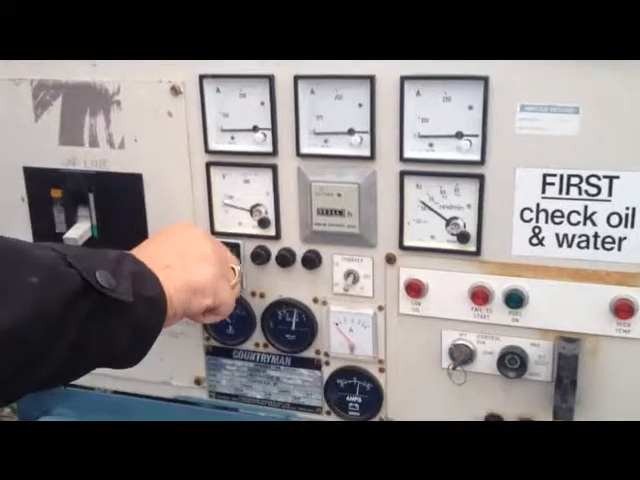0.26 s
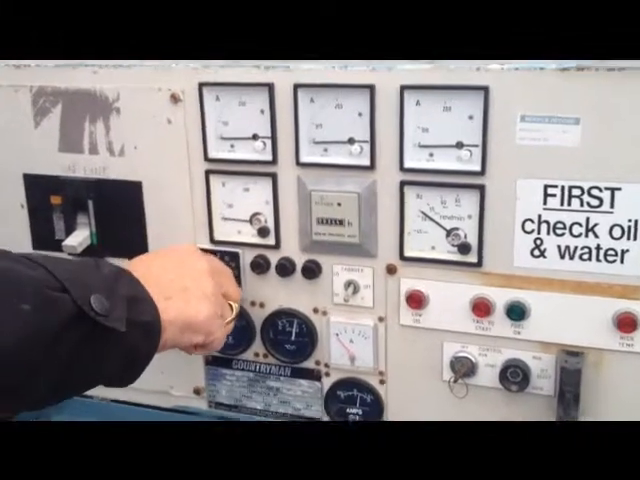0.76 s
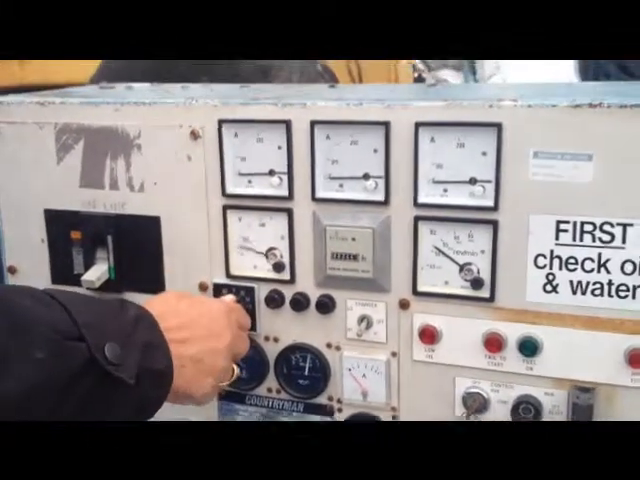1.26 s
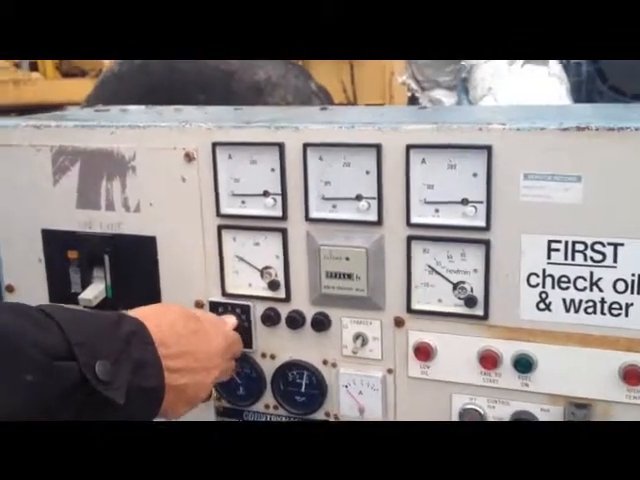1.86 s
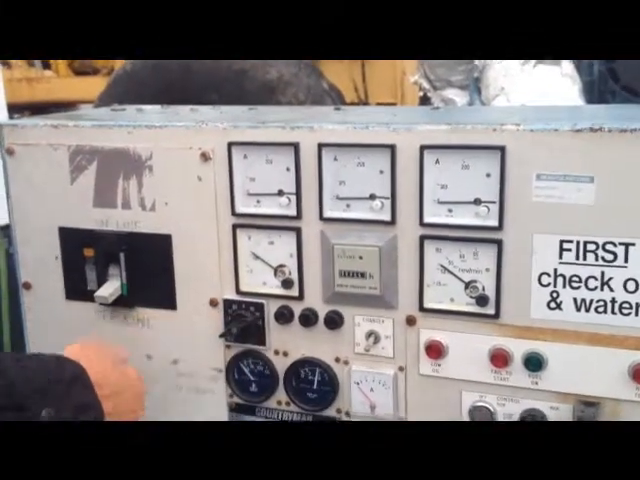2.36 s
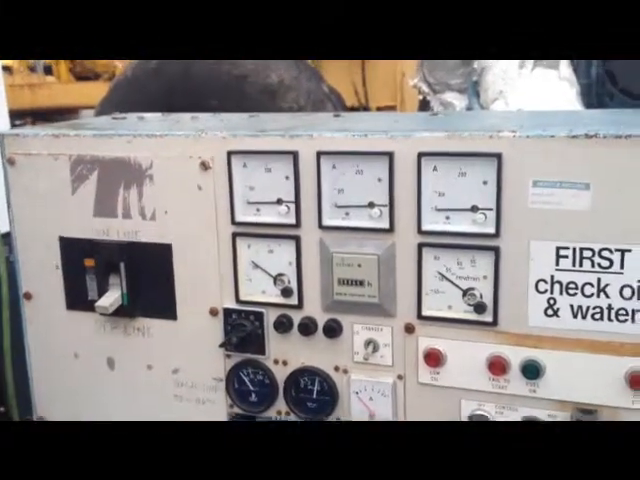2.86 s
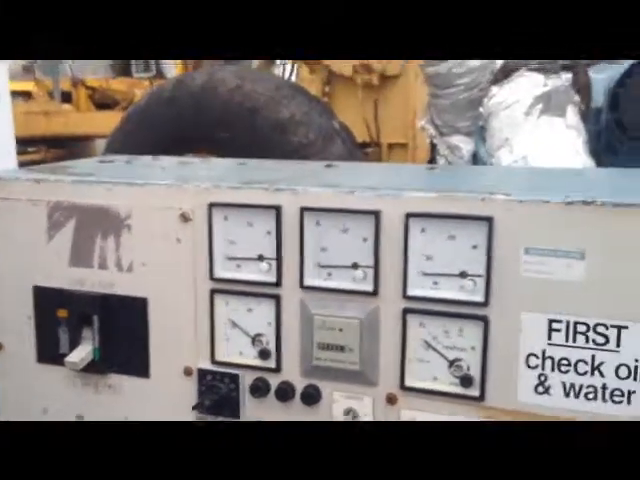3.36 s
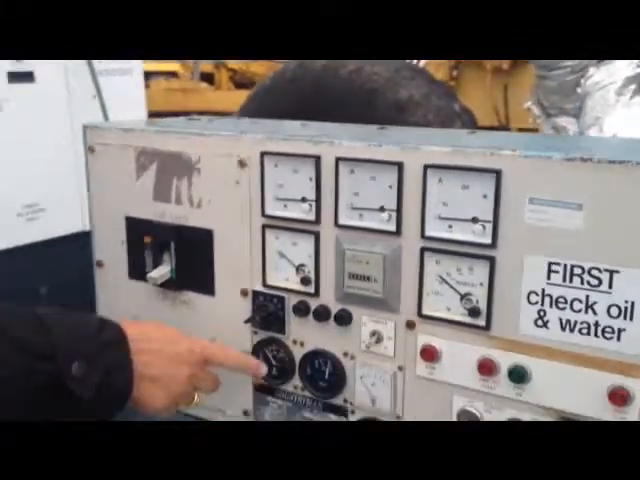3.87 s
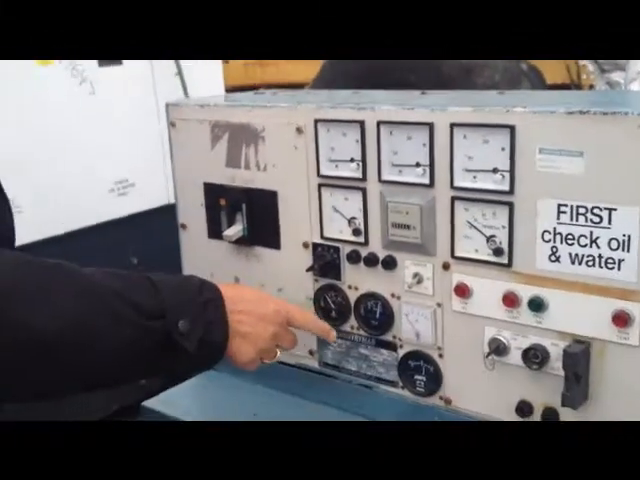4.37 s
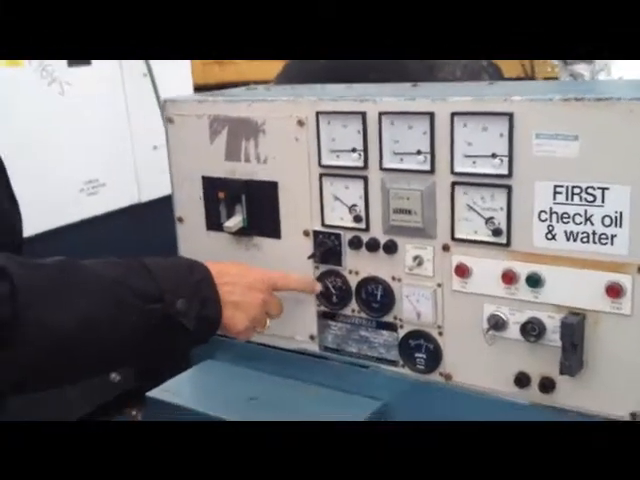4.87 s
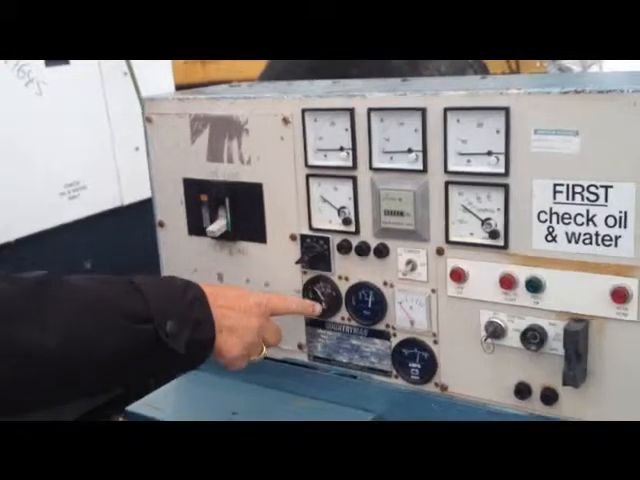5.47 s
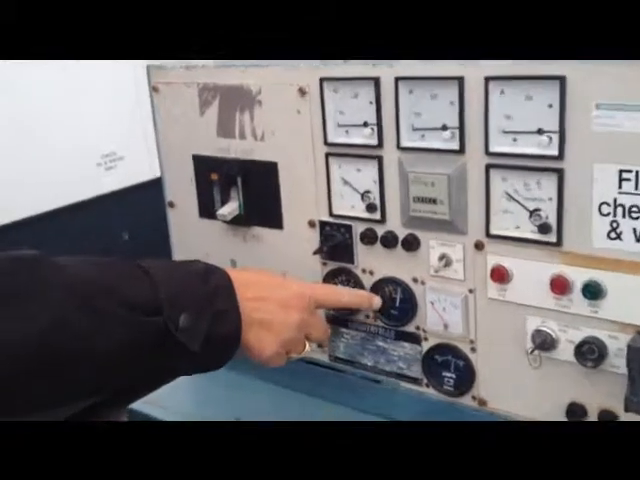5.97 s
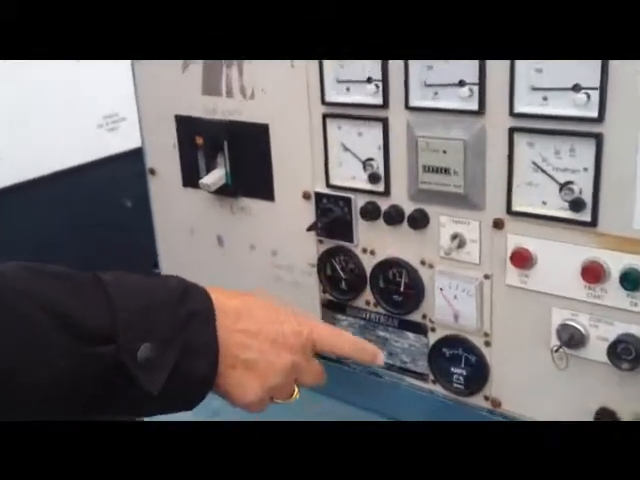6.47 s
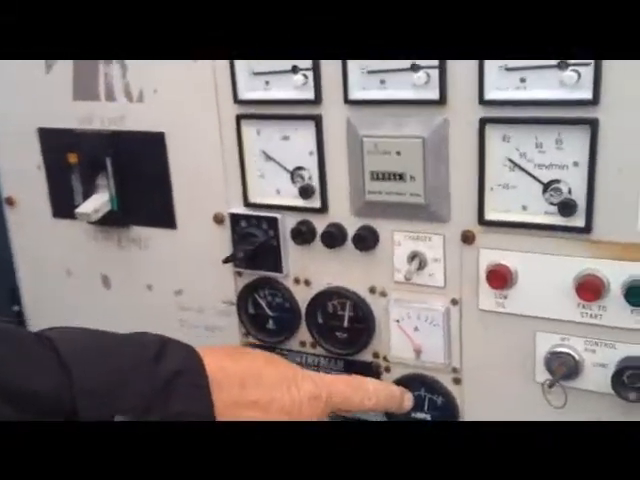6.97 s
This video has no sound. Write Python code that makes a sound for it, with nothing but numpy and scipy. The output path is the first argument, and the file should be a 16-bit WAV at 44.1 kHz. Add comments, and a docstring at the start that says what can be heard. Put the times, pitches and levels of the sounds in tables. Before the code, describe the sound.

Heard from close by outdoors, a big diesel generator hums and chugs at a constant speed. Rapid knocking and bright metal rattling ride over the droning exhaust and the fan's rushing air, with a few faint sharp ticks. The whole sound pulses quickly and regularly, then evens out in the last seconds as the moving microphone comes closer to the dials.

```python
"""A throbbing exhaust drone with metal clatter on top: a six-cylinder diesel generator in a yard, close by.
The exhaust beats against the fan's blade tone, each firing knocks the block, and injectors and valves
clatter over the rush of the fan. The governor hunts, so everything throbs about four times a second,
less towards the end. One microphone, through a limiter, rises to the top edge of the control panel,
turns along it and moves in on the dials."""
import sys
import numpy as np
from scipy import signal
from scipy.fft import rfft, irfft, next_fast_len
from scipy.io import wavfile
from scipy.ndimage import uniform_filter1d

SR = 44100
rng = np.random.default_rng(int(sys.argv[2]) if len(sys.argv) > 2 else 0)


def store_pcm(level_fs):
    """Save levels as 16-bit WAV."""
    pcm = np.round(np.clip(level_fs, -1, 1) * 32767).astype(np.int16)
    wavfile.write(sys.argv[1], SR, np.atleast_2d(pcm).T)


N = 318402
TIME_S = np.arange(N) / SR

CYCLE_HZ, HUNT_HZ = 13.114, 4.08  # four-stroke cycles (two turns each); the governor's swing
HARD_PLACE = 0.42  # where in the cycle (0-1) the hardest exhaust pulse leaves
SILENCER_HARMONIC = 18  # the silencer rings on this multiple of the cycle rate
# The microphone's moves, each as start_s, end_s
LIFT_S, CLOSE_S = (1.7, 4.1), (5.1, 6.9)  # up to the panel's top edge; in towards the dials
TURN_S, TURN_BACK_S = (2.97, 4.65), (6.99, 7)  # along the panel; back to face it

# Levels in the tables are relative; a harmonic is a multiple of the cycle rate.
# Bands that swell or fade as the microphone moves: centre_hz, width_hz, lifted_db, turned_db, close_db
MIC_BANDS = [(400, 86, 1.5, -2, -1.5), (518, 27, -3, 4.5, 0), (685, 19, 2, 3.5, -5), (790, 40, -2, 0, 0.5),
             (1100, 130, -1, 1, 0.5), (1610, 50, -6, -2, 1), (2450, 200, 1, -1, 0),
             (2950, 270, 2.5, -0.5, 2), (3700, 380, 0, 0.3, 0), (4700, 300, -3, -1.5, 1),
             (5450, 290, 1.2, -3.5, 0.5), (6670, 480, 0, 2.5, -1), (9000, 1200, 2.5, 0.5, 1)]
# Spectrum of the block's knock and the fan air: frequency_hz, level_db
BLOCK_SPECTRUM = [(190, -36.5), (310, -5), (355, -1.5), (436, -7.5), (514, -3), (555, -6), (615, 0),
                  (706, -3), (769, 0), (853, -4), (1030, -3.2), (1150, -6.5), (1260, -6), (1730, -9.5),
                  (1950, -10.5), (2100, -9.5), (2500, -18.5), (3250, -49), (5500, -120)]
# Spectrum of the injectors and valves: frequency_hz, level_db
CLATTER_SPECTRUM = [(1470, -17.5), (2500, -3), (4310, -3), (5110, -7.5), (6520, -8.5), (8000, -13),
                    (10400, -56.5), (17600, -120)]
# Spectrum of the fizz above the clatter: frequency_hz, level_db
FIZZ_SPECTRUM = [(6000, -35), (8000, -1.5), (8700, -0.5), (9400, -6.5), (10300, -8), (10900, -3),
                 (11600, -6), (13000, -7.5), (14500, -16)]
# Spectrum of the turbulent exhaust gas: frequency_hz, level_db
GAS_SPECTRUM = [(20, -38), (60, -29), (105, -1), (135, 2), (180, -12), (215, 16.5), (270, 3), (305, 7.5),
                (360, -17), (600, -27.5)]
# Cylinders in firing order: place_cycles, knock_db, clatter_db, swing_db (per unit of fuel)
FIRING_ORDER = [(.125, -8, 4, 6.5), (.305, -5.5, 5, -0.5), (0.469, -5, -0.5, -2.5), (.635, -12.5, 5, -2.5),
                (.79, -8.5, 4, 5.5), (.965, -6, 4, 4.5)]
# Surges that rattle harder than the rest: centre_s, block_db, clatter_db
RATTLE_SURGES = [(.01, 4, 3.5), (.31, 2.5, -1), (.55, 2, -0.5), (.76, 2, 2), (.99, 2, 1), (1.22, 2, 1),
                 (1.7, 1.5, 0.5), (1.98, 2, -0.5), (2.22, 2.5, 0.5), (2.68, 2, 1.3), (2.9, 0.5, 1),
                 (3.19, 2.5, 1.8), (3.44, 1.5, 1.5), (4.13, 2.5, 1.5), (4.39, -1.5, 1.5), (4.63, -0.5, 1),
                 (5.42, 2, 1)]
# Sharp metallic ticks at the hardest firings: time_s, level_db
METAL_TICKS = [(.469, -22), (1.219, -21), (1.704, -20), (2.389, -18), (2.689, -19.5), (2.897, -19),
               (4.344, -19)]
# Tones of the block and its casing: harmonic (rounded when played), level_db, turned_db
CASING_TONES = [(39, -46.5, 3), (42, -49.5, 7.5), (45, -46.5, -10), (48, -38, -5), (51, -50.5, 9.5),
                (54, -56, 5), (57, -40, -5), (58, -49.5, 4.5), (60, -43.5, 1.5), (65.6, -46.5, -9),
                (72.3, -42.5, -0.5), (75.3, -46, -5), (77.7, -43, -3.5), (79.2, -51.5, 10),
                (80.96, -40, -0.5), (93, -52.5, 3.5), (96.1, -44, -1), (100.8, -54, 3), (114.7, -46.5, 3.5),
                (124.3, -44, -4)]
# Faint, short low thumps on the loudest beats of the drone: start_s, level_db
LOW_THUMPS = [(0.028, -40), (0.491, -44.5), (0.788, -44.5), (1.02, -41.5), (1.247, -49.5), (1.705, -45),
              (1.934, -46), (2.013, -48), (2.24, -43.5), (2.415, -47), (2.469, -47), (2.697, -41.5),
              (2.925, -38), (3.225, -47.5), (3.458, -35), (3.687, -38.5), (3.917, -39.5), (4.144, -46),
              (4.221, -45.5), (4.372, -43.5), (4.452, -43), (4.682, -46.5), (4.908, -42.5), (5.135, -45),
              (5.213, -43.5), (5.441, -45), (5.674, -47), (5.9, -45.5), (6.13, -45.5)]
# Strong exhaust tones, standing as waves in the yard: harmonic, level_db, lifted_db, turned_db, close_db
STRONG_HARMONICS = [(12, -20.5, 0, -1.01, 3), (15, -25.5, -0.5, -2, 3), (18, -18.5, -1, 0.8, 1.5),
                    (21, -26, -3.5, -2, 0.5), (24, -41, 4, 8, -0.5), (40, -39, -7, 6, -1)]
# Weaker exhaust tones: harmonic, level_db
WEAK_HARMONICS = [(6, -54), (9, -44.5), (10, -39.5), (13, -43.5), (14, -53), (16, -45), (17, -34),
                  (19, -42.5), (22, -47), (26, -43), (27, -46.5), (30, -44)]


def gain_of(db):
    """Decibels to gain."""
    return 10 ** (np.asarray(db) / 20)


def unit_rms(x):
    """Scales to rms 1."""
    return x / np.sqrt(np.mean(x ** 2) + 1e-20)


def coloured(x, spectrum):
    """Filters x by a spectrum table, at rms 1."""
    hz, db = np.transpose(spectrum)
    size = next_fast_len(N)
    bin_hz = np.fft.rfftfreq(size, 1 / SR)
    shape = gain_of(np.interp(np.log(bin_hz + 1), np.log(hz + 1), db))
    return unit_rms(irfft(rfft(x, size) * shape, size)[:N])


def drift(top_hz):
    """A random wander of rms 1, rolled off above top_hz."""
    size = next_fast_len(N)
    bin_hz = np.fft.rfftfreq(size, 1 / SR)
    return unit_rms(irfft(rfft(rng.standard_normal(size)) / (1 + (bin_hz / top_hz) ** 4))[:N])


def ease(start_s, end_s):
    """A smooth step from 0 to 1 between two times."""
    return np.sin(np.pi / 2 * np.clip((TIME_S - start_s) / (end_s - start_s), 0, 1)) ** 2


def mic_pose():
    """How far the microphone is lifted, turned and close to the dials, each 0-1."""
    away = ease(*TURN_S)
    return ease(*LIFT_S) * (1 - away), away * (1 - ease(*TURN_BACK_S)), ease(*CLOSE_S)


def exhaust_exposure(clear_s=(2.2, 3.3)):
    """How directly the exhaust reaches the microphone, 0-1; at the dials the panel shields it again."""
    return ease(*clear_s) * (1 - ease(*CLOSE_S))


def panel_reflections(x, ripple_db=1.5, ripple_hz=70, ripple_s=0.14):
    """Reflections off the panel and doors ripple the spectrum; bands shift as the microphone moves."""
    hz, t, spectra = signal.stft(x, SR, nperseg=1024, noverlap=768)
    patch = np.exp(-((hz[:, None] - hz.mean()) / ripple_hz) ** 2 - ((t - t.mean()) / ripple_s) ** 2)
    ripple = unit_rms(signal.fftconvolve(rng.standard_normal(spectra.shape), patch, "same"))
    ripple *= (hz / (hz + 600))[:, None]  # long waves pass round the panel
    moves = np.array([np.interp(t, TIME_S, move - move.mean()) for move in mic_pose()])
    bands_db = sum(np.outer(np.exp(-((hz - centre) / width) ** 2), np.array(change_db) @ moves)
                   for centre, width, *change_db in MIC_BANDS)
    spectra = spectra * gain_of(ripple_db * ripple + bands_db)
    return signal.istft(spectra, SR, nperseg=1024, noverlap=768)[1][:N]


def low_thumps(rise_s=0.0015, boost_db=10.5):
    """Faint, short low thumps on the loudest beats of the drone."""
    rises = np.arange(SR // 40) / SR / rise_s
    clicks = np.zeros(N)
    for start_s, db in LOW_THUMPS:
        clicks[round(start_s * SR)] = gain_of(boost_db + db)
    return signal.oaconvolve(clicks, rises * np.exp(1 - rises))[:N]


def governor(lead_periods, hunt_depth=0.4, calm_depth=0.14, settle_s=(4.4, 6.2)):
    """The fuel supply swings about zero, then calms; every swing_db is per unit of this signal."""
    depth = hunt_depth + (calm_depth - hunt_depth) * ease(*settle_s)
    return depth * np.cos(2 * np.pi * (HUNT_HZ * TIME_S + lead_periods))


def crankshaft(fuel, speed_swing=0.0048):
    """Running count of engine cycles; the speed follows the fuel a little."""
    return np.cumsum(CYCLE_HZ * (1 + speed_swing * fuel)) / SR


def firings(cycles, place, level_db, scatter_db):
    """One click each time a cylinder fires, no two quite alike."""
    at = np.flatnonzero(np.diff(np.floor(cycles - place)))
    clicks = np.zeros(N)
    clicks[at] = gain_of(level_db[at] + scatter_db * rng.standard_normal(N // 1000)[:len(at)])
    return clicks


def surges(width_s=0.025):
    """Brief changes in dB, one row for the block and one for the clatter."""
    centre_s, *changes_db = np.transpose(RATTLE_SURGES)
    return np.array(changes_db) @ np.exp(-((TIME_S - centre_s[:, None]) / width_s) ** 2)


def air_and_metal(spectrum, power, pulsed_share, grain_db):
    """Steady fan air plus grainy metal noise in time with the firings."""
    metal = power * gain_of(grain_db * drift(top_hz=700))
    envelope = np.sqrt(1 - pulsed_share + pulsed_share * metal / metal.mean())
    return coloured(envelope * rng.standard_normal(N), spectrum)


def fan_tone(fuel, cycles, blades_per_cycle=19.988, aligned_s=4.7, open_s=(1.6, 3.9), swing_db=3.5):
    """The belt-driven fan runs just off a harmonic, so its beat with the exhaust slowly wanders."""
    in_step = np.floor(cycles[round(aligned_s * SR)]) + HARD_PLACE  # blades meet the hard pulse here
    close = mic_pose()[2]
    placed_db = -31 + 3.5 * ease(*open_s) - 1.7 * close  # louder once out from behind the panel
    level_db = placed_db + swing_db * fuel + 0.5 * drift(top_hz=8)
    return gain_of(level_db) * np.sqrt(2) * np.cos(2 * np.pi * blades_per_cycle * (cycles - in_step))


def casing_tones(fuel, cycles, flutter_db=1.6, swing_db=3.0):
    """The firings keep the block and its sheet metal singing on fluttering harmonics of the cycle."""
    turned, tones = mic_pose()[1], np.zeros(N)
    for k, db, turned_db in CASING_TONES:
        level_db = db + turned_db * turned + flutter_db * drift(top_hz=9)
        tones += gain_of(level_db) * np.sqrt(2) * np.cos(2 * np.pi * (round(k) * cycles + rng.random()))
    return tones * gain_of(swing_db * fuel)


def injector_power(fuel, cycles, rise_s=0.003, scatter_db=1, follow=0.9):
    """Power of the injector and valve noise: a short swell at every firing, mean 1."""
    t = np.arange(SR // 25) / SR
    clicks = sum(firings(cycles, place, db + follow * swing_db * fuel, scatter_db)
                 for place, _, db, swing_db in FIRING_ORDER)
    power = np.maximum(signal.oaconvolve(clicks ** 2, t * np.exp(-t / rise_s))[:N], 0)
    return power / power.mean()


def metal_ticks(trim_db=-6.0, lead_s=0.00092, decay_s=0.0028):
    """Each tick is a short bright burst of the clatter."""
    t = TIME_S + lead_s
    envelope = sum(gain_of(db + trim_db) * (t >= time_s) * np.exp(-abs(t - time_s) / decay_s)
                   for time_s, db in METAL_TICKS)
    return envelope * coloured(rng.standard_normal(N), CLATTER_SPECTRUM)


def block_knock(fuel, cycles, ring_t60_s=0.16, yard_t60_s=0.37, yard_db=-15, scatter_db=1.26, spots=4):
    """Each cylinder rings the block in its own way; the echoes crossfade as the microphone moves."""
    t = np.arange(SR // 6) / SR
    decay = gain_of(-60 * t / ring_t60_s) + gain_of(yard_db - 60 * t / yard_t60_s)
    mic_spot = np.linspace(0, spots - 1, N)
    nearness = [np.cos(np.pi / 2 * np.minimum(abs(mic_spot - k), 1)) for k in range(spots)]
    knocks = np.zeros(N)
    for place, knock_db, _, swing_db in FIRING_ORDER:
        clicks = firings(cycles, place, knock_db + swing_db * fuel, scatter_db)
        for near in nearness:
            knocks += signal.oaconvolve(clicks * near, decay * rng.standard_normal(len(t)))[:N]
    return coloured(knocks, BLOCK_SPECTRUM)


def silencer_chug(fuel, cycles, rise_cycles=0.0045, decay_cycles=0.08, puff_share=0.135, swing_db=11.0):
    """Once a cycle a hard pulse rings the silencer, and a puff of turbulent gas follows it."""
    since = (cycles - HARD_PLACE) % 1
    blow = (1 - np.exp(-since / rise_cycles)) * np.exp(-since / decay_cycles)
    ring_db = -27.5 + exhaust_exposure()  # 1 dB up when clear of the panel
    ring = gain_of(ring_db) * blow * np.cos(2 * np.pi * SILENCER_HARMONIC * since)
    flow = 1 - puff_share + puff_share * unit_rms(blow)
    gas = gain_of(-34) * coloured(flow * rng.standard_normal(N), GAS_SPECTRUM)
    return (ring + gas) * gain_of(swing_db * fuel)


def exhaust_drone(fuel, cycles, flutter_db=1.2, swing_db=4.0, waver_db=0.96, strong_trim_db=-2.0):
    """Harmonics of the cycle meet in one hard pulse; the even firing drone runs a little ahead of it."""
    lifted, turned, close = mic_pose()
    shielded = 1 - exhaust_exposure()  # behind the panel only echoes arrive, and the pulses run together
    heat = governor(lead_periods=-0.11)  # the gas heat sways the silencer's ring

    def harmonic(k):
        """One partial, its phase set by its origin; those above the silencer's ring flutter."""
        above_ring = k - SILENCER_HARMONIC
        even = k % 6 == 0  # from all six cylinders alike
        half = k % 6 == 3  # from the two halves of the manifold
        uneven = k % 3 > 0  # from one cylinder firing harder
        lead_rad = 0.59 * even + (0.53 + 0.81 * heat) * (above_ring == 0)
        blur_rad = 0.46 * shielded * np.clip(above_ring * abs(above_ring), -4, 4) * uneven
        lag_rad = 0.15 * (1 + shielded) * half
        phase = 2 * np.pi * k * (cycles - HARD_PLACE) + lead_rad - blur_rad - lag_rad
        flutter = gain_of(flutter_db * drift(top_hz=10)) if above_ring > 0 else 1
        return flutter * np.sqrt(2) * np.cos(phase)

    strong = sum(gain_of(db + lifted_db * lifted + turned_db * turned + close_db * close) * harmonic(k)
                 for k, db, lifted_db, turned_db, close_db in STRONG_HARMONICS)
    weak = sum(gain_of(db) * harmonic(k) for k, db in WEAK_HARMONICS)
    throb = gain_of(swing_db * fuel + waver_db * drift(top_hz=22.3))
    return (gain_of(strong_trim_db) * strong + weak) * throb


def scene():
    """The generator from its control panel, in mono: one crankshaft and one governor set the pace."""
    # The injectors answer the governor first, the exhaust last.
    injection, burn, fuel = governor(0.11), governor(0.011), governor(-0.044)
    cycles = crankshaft(fuel)
    lifted, turned, close = mic_pose()
    heave_db, rattle_db = surges()
    power = injector_power(injection, cycles)
    rattle_db = rattle_db + 0.5 * drift(top_hz=11.0)
    # Louder close up; the treble is unshaded over the panel's edge, and the fizz is lost off axis.
    block_db = -24.5 + 0.6 * close + heave_db
    clatter_db = -32 + 0.6 * close + 1.1 * lifted + rattle_db + 1.11 * injection
    fizz_db = -43.5 + 1.8 * close + 1.1 * lifted - 2.5 * turned + rattle_db + 0.87 * injection
    air_db = block_db - 2.5 + 1.1 * burn
    knock = gain_of(block_db - 5.0) * block_knock(burn, cycles)
    casing = gain_of(heave_db + 0.3) * casing_tones(burn, cycles)
    air = gain_of(air_db) * air_and_metal(BLOCK_SPECTRUM, power, pulsed_share=0.096, grain_db=4.5)
    clatter = gain_of(clatter_db) * air_and_metal(CLATTER_SPECTRUM, power, pulsed_share=0.32, grain_db=4.5)
    fizz = gain_of(fizz_db) * air_and_metal(FIZZ_SPECTRUM, power, pulsed_share=0.4, grain_db=3.0)
    exhaust = exhaust_drone(fuel, cycles) + silencer_chug(fuel, cycles)
    machinery = fan_tone(fuel, cycles) + metal_ticks() + casing
    return (exhaust + low_thumps() + machinery + panel_reflections(knock + air + clatter + fizz))[None]


def record(dry, ceiling=0.51, recovery_db_per_s=200, cutoff_hz=14500):
    """A limiter behind the microphone ducks each high peak at once and recovers; a low-pass follows."""
    over_db = 20 * np.log10(np.maximum(abs(dry[0]) / ceiling, 1))
    recovery_db = TIME_S * recovery_db_per_s
    held_db = np.maximum.accumulate(over_db + recovery_db) - recovery_db
    limited = dry / gain_of(uniform_filter1d(held_db, size=8))
    low_pass = signal.firwin(255, cutoff_hz, window=("kaiser", 9), fs=SR)
    return signal.oaconvolve(limited, low_pass[None], "same")


dry = scene()
out = record(dry)
store_pcm(out)
```